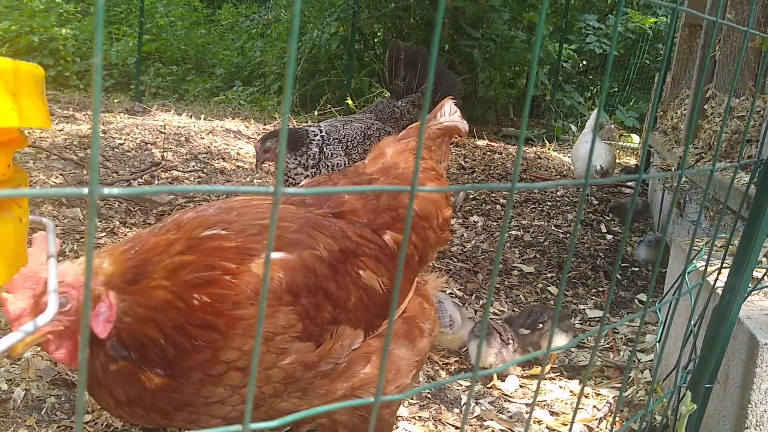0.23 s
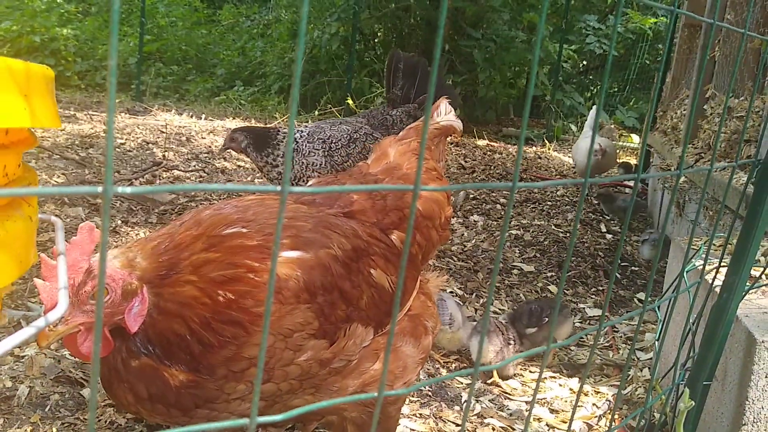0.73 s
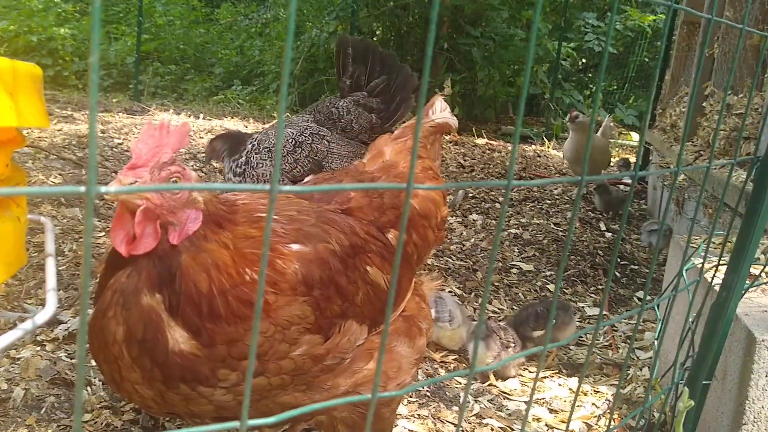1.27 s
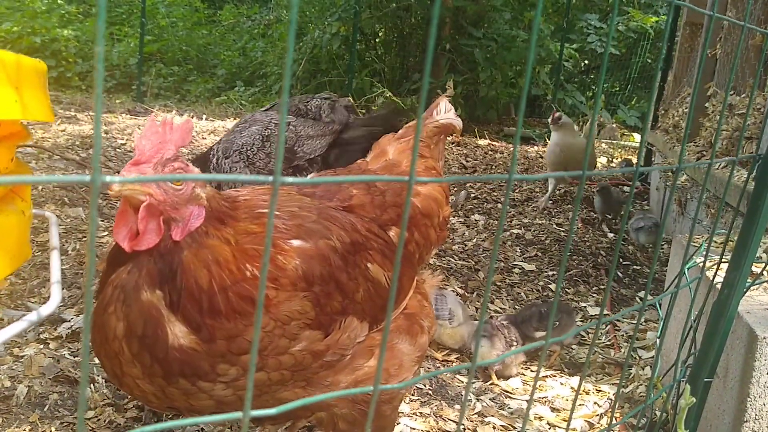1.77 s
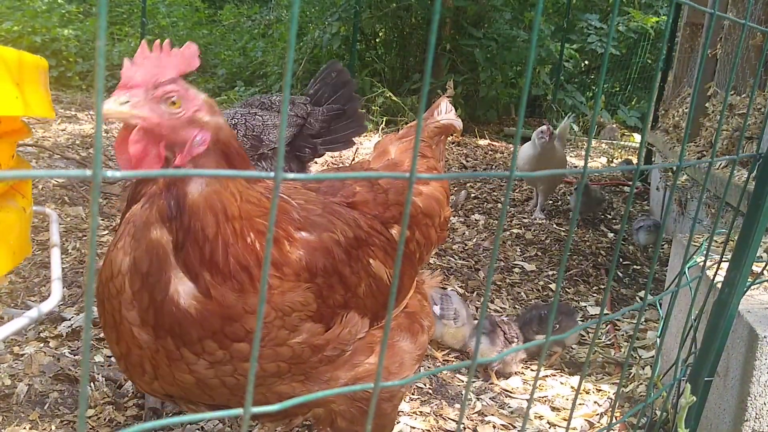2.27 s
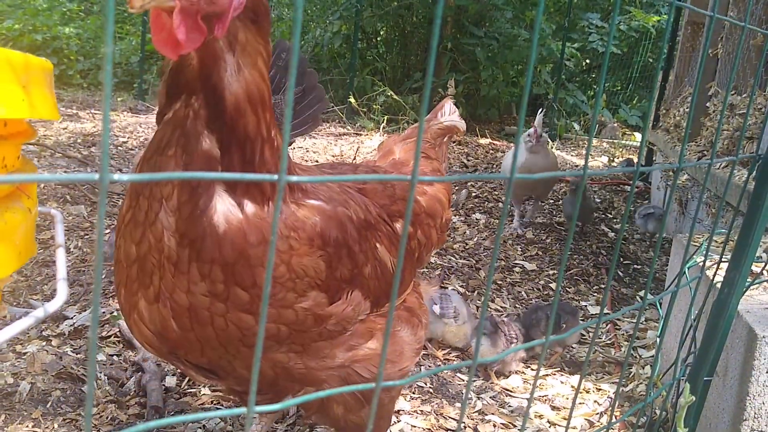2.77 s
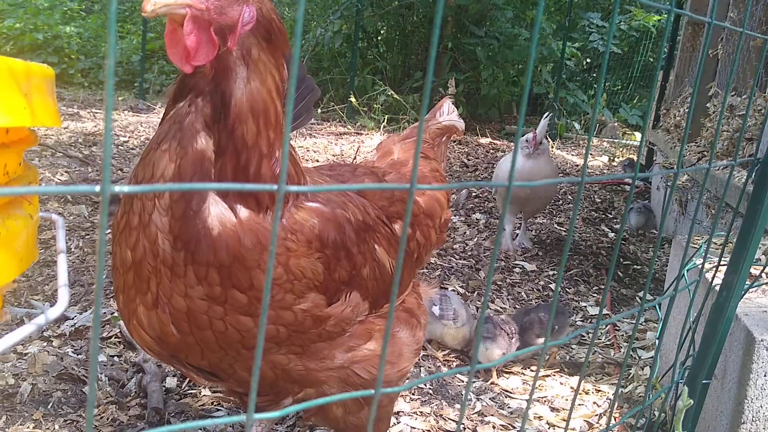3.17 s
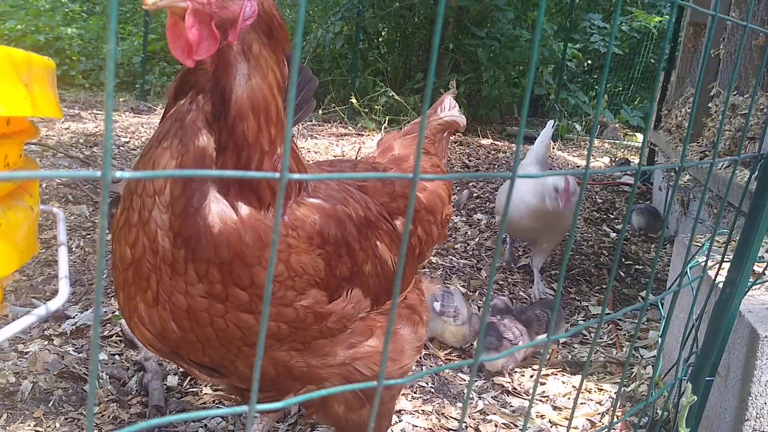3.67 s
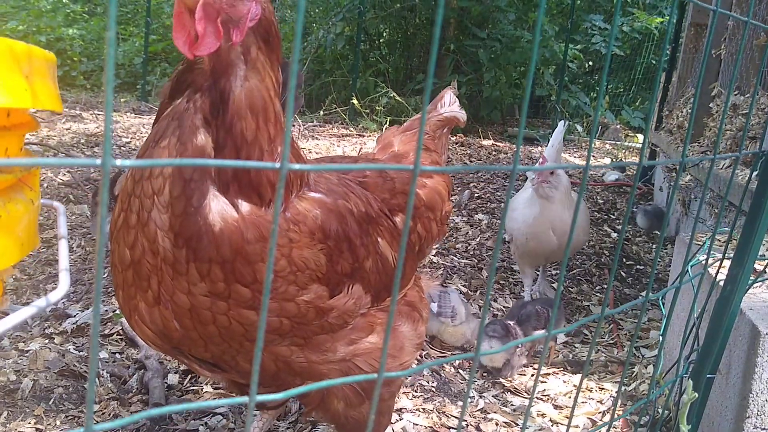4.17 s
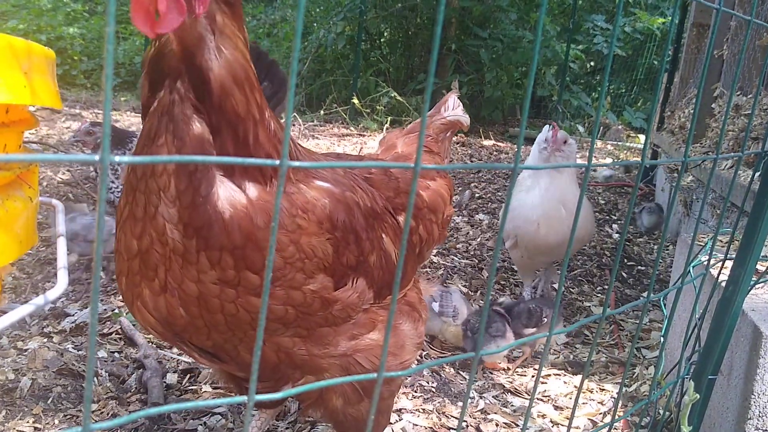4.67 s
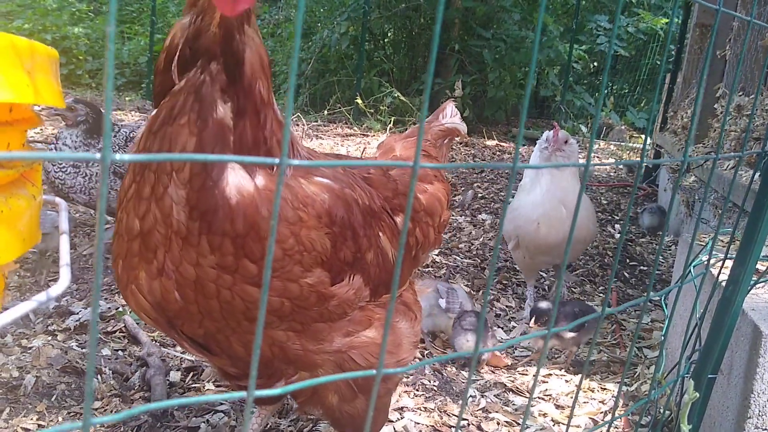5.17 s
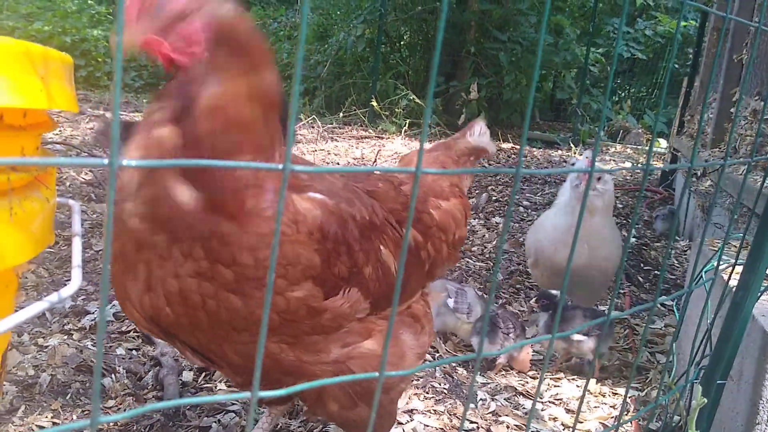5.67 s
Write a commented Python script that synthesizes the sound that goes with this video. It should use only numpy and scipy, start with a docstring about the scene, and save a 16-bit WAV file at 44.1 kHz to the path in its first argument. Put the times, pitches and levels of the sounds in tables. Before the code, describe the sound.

A nearby hen opens with a held, quavering wail. Short clucks and thin chick peeps follow, then a rising moan and a squeak lead into a second, longer wail. Several hens moan softly over one another, and one gives a brief dry rattle near the end. Behind them in the outdoor run, faint cicadas swell over a low rumble and a few distant bird notes.

```python
"""Hens and chicks in a backyard

Hens wail, moan, squeak and cluck, their voices shaped by throat resonances; one ends with a dry rattle.
Chicks peep around them in short gliding whistles, and far-off birds hold faint notes. Cicadas swell
in the trees, a hissing chorus and one clicking buzz, over a low rumble and the hush of the garden."""
import sys
import numpy as np
from scipy import signal
from scipy.fft import rfft, irfft
from scipy.io import wavfile

SR = 44100
rng = np.random.default_rng(int(sys.argv[2]) if len(sys.argv) > 2 else 0)


def file_out(sig):
    """Save sig as 16-bit WAV at sys.argv[1]."""
    # one column per channel
    cols = np.atleast_2d(sig).T
    # limit, then scale
    lim = np.clip(cols, -1, 1)
    pcm = np.round(lim * 32767).astype(np.int16)
    wavfile.write(sys.argv[1], SR, pcm)


N = 260631
TIME = np.arange(N) / SR


def gain_of(db):
    """Decibels to a factor."""
    return 10 ** (np.asarray(db) / 20)


def unit_rms(x):
    """Scales to an rms of one."""
    return x / np.sqrt(np.mean(x ** 2) + 1e-20)


def db_at(spectrum, hz):
    """Reads a spectrum on a log-frequency axis."""
    points_hz, db = np.transpose(spectrum)
    return np.interp(np.log(hz + 1), np.log(points_hz + 1), db)


def follow(rows, t):
    """Reads every column of a curve at the times t."""
    times, *columns = np.transpose(rows)
    return [np.interp(t, times, column) for column in columns]


def add(mix, start_s, sound):
    """Mixes a sound in at start_s."""
    part = mix[max(round(start_s * SR), 0):][:len(sound)]
    part += sound[:len(part)]


def noise(colour):
    """Noise of unit rms with the given spectrum."""
    hz = np.fft.rfftfreq(N, 1 / SR)
    return unit_rms(irfft(rfft(rng.standard_normal(N)) * gain_of(db_at(colour, hz)), N))


def waver(rate_hz, octaves, size=N):
    """Random wobble of about unit rms, in a band around a rate."""
    hz = np.fft.rfftfreq(N, 1 / SR)
    band = np.exp(-(np.log2((hz + 0.00093) / rate_hz) / octaves) ** 2 / 2)
    return unit_rms(irfft(rfft(rng.standard_normal(N)) * band, N))[:size]


def bump(t, length):
    """A smooth rise and fall, centred on zero."""
    return np.cos(np.pi * np.clip(t / length, -.5, .5)) ** 2


def yard(x, wet_db, t60_s):
    """Adds sparse, fading scatter from fence, wall and trees."""
    t = np.arange(SR // 2) / SR
    taps = rng.standard_normal(len(t)) * (rng.random(len(t)) < 2000 / SR)
    taps *= (t > .005) * gain_of(-60 * t / t60_s)
    return x + gain_of(wet_db) * signal.fftconvolve(x, taps / np.linalg.norm(taps))[:N]


# Air rushing through the open beak: freq_hz, level_db
BEAK_AIR = [(100, -17), (400, -7.5), (900, 8), (1300, -5), (1550, -17.5), (1850, 5.5), (2500, -22),
            (3000, -26.5), (3600, -1.5), (4200, -9), (7200, -8), (8200, -23)]
def hen_voice(rows, throat, quaver, quaver_hz, jitter, rasp, upper_db, air_db, doubling=((0, 0),)):
    """Quavering harmonics filtered by the throat, plus pulsing breath; returns start_s and the sound."""
    t = np.arange(rows[0][0], rows[-1][0], 1 / SR)
    size = len(t)
    pitch_hz, level_db, second_db = follow(rows, t)
    hz = pitch_hz * (1 + quaver * waver(quaver_hz, 1.0, size))
    turns = np.cumsum(hz * (1 + jitter * waver(90, 0.4, size))) / SR
    # second_db and upper_db set harmonics 2 and 3 against the first, ahead of the throat
    source_db = [0, second_db] + [upper_db - 6 * np.log2(k / 3) for k in range(3, 9)]
    tone = power = 0
    for k, db in enumerate(source_db, 1):
        tone += gain_of(db + db_at(throat, k * hz)) * np.cos(2 * np.pi * k * turns)
        power += gain_of(db + db_at(throat, k * pitch_hz)) ** 2 / 2
    # uneven beats rasp; alternating strong and weak beats add the octave below
    depth, = follow(doubling, t)
    beats = 1 + rasp * waver(49, 0.66, size)
    beats += depth * (1 + 0.54 * waver(25, 0.78, size)) * np.cos(np.pi * turns)
    air = gain_of(air_db) * noise(BEAK_AIR)[:size] * (1 + 0.32 * np.cos(2 * np.pi * turns))
    fades = signal.windows.tukey(size, 0.0019 * SR / size)
    return t[0], gain_of(level_db) * (tone / np.sqrt(power) * beats + air) * fades


# Upward catches in a wail: centre_s, length_s, rise_hz
CATCHES = [(0.083, .06, 52), (0.324, .04, 25.5), (0.383, .035, 44), (2.961, .05, 75.5), (3.038, .04, 46),
           (3.129, 0.088, 73), (3.279, 0.068, 90), (3.36, 0.0333, 85), (3.465, 0.063, 35.5),
           (3.53, 0.032, 37.5), (3.627, .04, 19.7)]
def wail_contour(start_s, hold_s, release_s, start_db, full_db, second_db, sag):
    """Rows for hen_voice: a note that swells and lifts with effort, thins as it catches, then drops."""
    t = np.arange(0, hold_s + release_s, .001)
    effort_db = full_db + (start_db - full_db) * np.clip(1 - t / hold_s, 0, 1) ** 1.3
    held_hz = 644.1 + 3 * (effort_db + 40)
    lift_hz = sum(rise * bump(start_s + t - centre, length) for centre, length, rise in CATCHES)
    after_s = np.maximum(t - hold_s, 0)
    dropped = 1 - np.exp(-(after_s / 0.015) ** 2)
    dying = (after_s / release_s) ** 4
    pitch_hz = (held_hz + lift_hz) * (1 - .21 * dropped) * (1 - sag * dying)
    level_db = effort_db - 0.0167 * lift_hz - 4 * dropped - 22.5 * dying
    return np.transpose([start_s + t, pitch_hz, level_db, second_db + 0.5 * (level_db - full_db)])


# Hoarse spells in a wail: centre_s, length_s, depth_ratio
HOARSE_SPELLS = [(.01, 0.046, 0.2), (0.352, .05, 0.25), (3.021, 0.073, 0.56), (3.503, 0.038, 0.62),
                 (3.8, .12, 0.22)]
def hoarse(start_s, sound, rate_hz):
    """A second, slower vibration in the throat beats against the voice for moments at a time."""
    t = start_s + np.arange(len(sound)) / SR
    depth = sum(peak * bump(t - centre, length) for centre, length, peak in HOARSE_SPELLS)
    turns = np.cumsum(rate_hz * (1 + 0.11 * waver(30, 1.0, len(t)))) / SR
    return start_s, sound * (1 + depth * np.cos(2 * np.pi * turns))


# The throat of a wailing hen: freq_hz, gain_db
WAIL_THROAT = [(200, -14), (600, 0.5), (1290, 3.5), (1350, -7), (1420, -22), (1550, -1), (1900, -33),
               (2600, -30), (3600, -14.5), (5000, -39.5), (8000, -47.5)]
# Wails: start_s, hold_s, release_s, start_db, full_db, second_harmonic_db, final_sag_ratio
WAILS = [(0, 0.462, 0.054, -41.5, -39.5, 1.5, 0.42), (2.958, 0.8993, 0.1, -51.5, -39, 5, 0.06)]
def wails():
    """Two loud held cries; each catch pushes the second harmonic off the throat's resonance."""
    out = np.zeros(N)
    for row in WAILS:
        call = hen_voice(wail_contour(*row), WAIL_THROAT, quaver=0.019, quaver_hz=34.5, jitter=0.008,
                         rasp=0.064, upper_db=-8, air_db=-22, doubling=[(0, 0.0078)])
        add(out, *hoarse(*call, rate_hz=105))
    return out


# The swell of the chorus: time_s, level_db
CHORUS_SWELL = [(0.0, -66), (0.35, -65.5), (0.48, -68), (0.76, -72), (2.17, -67.5), (3.14, -60.5),
                (3.74, -57), (4.21, -59.5), (4.62, -57.5), (4.77, -60.5), (5.1, -61.5), (5.91, -60)]
# Its bright hiss: freq_hz, level_db
CHORUS_COLOUR = [(2500, -28), (3500, -14.5), (4200, -7.5), (4700, -1), (5500, -5.5), (6300, -1), (7200, 1),
                 (7650, 0), (7950, -19), (8400, -23.5)]
def cicada_chorus(trim_db=1):
    """Many far cicadas blur into a fluttering hiss."""
    level_db, = follow(CHORUS_SWELL, TIME)
    flutter_db = 0.74 * waver(12, 0.87)
    return gain_of(level_db + trim_db + flutter_db) * noise(CHORUS_COLOUR)


# The nearest cicada's buzz: time_s, level_db
BUZZ_SWELL = [(0, -79), (1.6, -76), (2.3, -69), (3.1, -59), (3.7, -59), (4.7, -60.5), (5.2, -65.5),
              (5.91, -63)]
# Its sharpest whine, a single harmonic: time_s, level_db
WHINE_SWELL = [(0, -83), (1.85, -75), (2.25, -63), (2.75, -62.5), (3.12, -54), (3.45, -62.5), (3.95, -58),
               (4.72, -61), (4.92, -72), (5.91, -69)]
# Multiples of the click rate that its body favours: harmonic_number, gain_db
CICADA_BODY = [(25, -6.5), (26, -10), (27, -9), (28, -7.5), (30, -11.5), (31, -17), (33, -12.5), (34, -3),
               (38, -14.5), (40, -24)]
def near_cicada(click_hz=203.6, quicken_hz_per_s=.76, whine_harmonic=36):
    """High harmonics of a slowly quickening click rate; leaves make each fade and drift by itself."""
    buzz_db, = follow(BUZZ_SWELL, TIME)
    whine_db, = follow(WHINE_SWELL, TIME)
    turns = np.cumsum(click_hz + quicken_hz_per_s * TIME) / SR

    def harmonic(k, fade_db):
        fading = gain_of(fade_db * waver(1.8, 1.1))
        return fading * np.cos(2 * np.pi * (k * turns + rng.random()) + 0.31 * waver(4.5, 0.52))

    buzz = sum(gain_of(db) * harmonic(k, fade_db=3) for k, db in CICADA_BODY)
    whine = harmonic(whine_harmonic, fade_db=1.8)
    return gain_of(buzz_db) * unit_rms(buzz) + gain_of(whine_db) * unit_rms(whine)


# The background bed: time_s, rumble_db, hush_db
GARDEN_LEVELS = [(0, -60, -68), (.4, -59.5, -74), (.6, -66.5, -76), (1.3, -67, -75.5), (2.2, -69, -74.5),
                 (2.6, -63, -70), (3.7, -59.5, -69.5), (4.8, -61.5, -72.5), (5.5, -60, -73.5),
                 (5.91, -67.5, -71.5)]
# The deep rumble: freq_hz, level_db
RUMBLE_COLOUR = [(18, -62), (35, -24), (50, -2.5), (62, 1.5), (78, -2), (92, -7), (122, -4.5), (160, -16),
                 (250, -22.5), (400, -46.5), (1000, -68)]
# The soft hush: freq_hz, level_db
HUSH_COLOUR = [(20, -28), (60, -0.5), (200, 5), (400, 0), (800, -0.5), (1500, -1.5), (2600, -4),
               (4000, -11), (8000, -16)]
def garden(hum_hz=78.4):
    """A distant low rumble with a wavering hum in it, and a soft broadband hush."""
    rumble_db, hush_db = follow(GARDEN_LEVELS, TIME)
    hum = np.sin(2 * np.pi * np.cumsum(hum_hz + 2.5 * waver(3.94, 0.99)) / SR)
    rumble = unit_rms(noise(RUMBLE_COLOUR) + gain_of(0.5) * hum)
    return gain_of(rumble_db) * rumble + gain_of(hush_db) * noise(HUSH_COLOUR)


def whistles(rows, glide, tremble, overtone_db):
    """Nearly pure bird notes; glide gives the pitch as u runs from 0 to 1 along each note."""
    out, wobble = np.zeros(N), waver(130, 1.0)
    for start_s, length_s, level_db, *shape in rows:
        u = np.arange(0, 1, 1 / (length_s * SR))
        unsteady = np.roll(wobble, -round(start_s * SR))[:len(u)]
        phase = 2 * np.pi * np.cumsum(glide(u, *shape) * (1 + tremble * unsteady)) / SR
        swell = np.sqrt(2) * np.sin(np.pi * u) ** 0.28 * (1 + 0.2 * unsteady)
        tone = np.sin(phase) + gain_of(overtone_db) * np.sin(2 * phase)
        add(out, start_s, gain_of(level_db) * swell * tone)
    return out


# Peeps that sweep up: start_s, length_s, level_db, start_hz
RISING_PEEPS = [(.449, 0.039, -60.5, 2200), (1.774, 0.028, -65, 2660), (1.92, .057, -65.5, 2250),
                (2.941, .028, -57.5, 2420), (3.668, 0.03, -60, 1998), (5.869, 0.031, -60.5, 2630)]
# Peeps that settle, then flick up: start_s, length_s, level_db, held_hz, start_above_ratio, rise_ratio
SCOOPED_PEEPS = [(.647, 0.054, -61, 2734, -0.0065, 0.77), (.9, 0.047, -61.5, 3080, 0.21, 0.37),
                 (1.65, 0.074, -67.5, 3140, 0.1, 0.4), (1.662, 0.049, -65, 2740, 0.058, 0.4),
                 (2.551, 0.053, -60, 3050, 0.06, 0.5), (2.745, .046, -62.5, 3540, -0.015, 0.13),
                 (3.627, .045, -60.5, 3180, 0.07, 0.1), (3.893, 0.055, -54, 2260, 0.16, 0.51),
                 (4.06, 0.046, -68.5, 3190, 0.047, .24), (4.22, .045, -68, 3920, .05, .1),
                 (4.44, .033, -65, 3930, .12, .02)]
# Peeps that sweep down: start_s, length_s, level_db, start_hz
FALLING_PEEPS = [(1.04, 0.061, -72.5, 3820), (1.17, .05, -74.5, 4260), (1.339, 0.02, -70, 4230),
                 (1.888, .037, -69.5, 4250), (2.085, 0.031, -71, 4170), (2.867, 0.033, -62.5, 4090),
                 (3.059, 0.038, -67.5, 4000), (3.521, .022, -66, 4380), (4.18, 0.025, -61, 4200),
                 (4.649, 0.037, -61.5, 3990), (4.768, 0.025, -64.5, 4200), (5.086, 0.046, -66.5, 3650)]
# Peeps that leap to a top note and slide off: start_s, length_s, level_db, top_hz, top_position_ratio
ARCHED_PEEPS = [(3.546, 0.054, -51, 3490, 0.35), (3.975, .055, -53, 3635, 0.24),
                (4.88, .052, -64, 3560, 0.2), (5.45, .028, -71, 2920, .3), (5.758, 0.039, -62.5, 3100, .25)]
def chicks():
    """Chicks whistle four shapes of peep; the falling ones are thinner and farther off."""
    rising = lambda u, hz: hz * (1 + .52 * u ** 1.2)
    scooped = lambda u, hz, above, rise: hz * (1 + above * (1 - u) ** 3 + rise * u ** 5.4)
    falling = lambda u, hz: hz * (1 - .24 * u ** 1.6)
    arched = lambda u, hz, top: hz * (1 - .19 * (u - top) ** 2 / ((u - top) ** 2 + 0.42 ** 2))
    kinds = [(RISING_PEEPS, rising), (SCOOPED_PEEPS, scooped), (ARCHED_PEEPS, arched)]
    near = sum(whistles(rows, glide, tremble=0.0033, overtone_db=-15) for rows, glide in kinds)
    far = whistles(FALLING_PEEPS, falling, tremble=0.0078, overtone_db=-21)
    return yard(near, wet_db=-17, t60_s=0.32) + yard(far, wet_db=-7.5, t60_s=0.092)


# Short clucks: start_s, length_s, level_db, pitch_hz, throat_hz
CLUCKS = [(.652, 0.026, -61.5, 353, 690), (.703, 0.02, -51.5, 546, 840), (1.328, .031, -65.5, 364, 840),
          (1.382, .016, -52.5, 510, 760), (1.659, .045, -51, 356.7, 740), (2.128, 0.016, -58, 253, 476),
          (2.141, 0.031, -51.5, 386.6, 910), (2.282, 0.016, -58, 240, 460), (2.292, 0.034, -52.5, 391, 710),
          (2.342, .015, -49.5, 505, 846), (3.96, 0.028, -62.5, 268, 414)]
def clucks(firm_db=-51.5):
    """Bursts of pulses and puffs through one throat resonance, cut steeply below it."""
    out = np.zeros(N)
    throat = lambda ratio: 1 / (1 + 1.25j * (ratio - 1 / ratio)) ** 2 / (1 + (0.58 / ratio) ** 6)
    for start_s, length_s, level_db, pitch_hz, throat_hz in CLUCKS:
        u = np.arange(0, 1, 1 / (length_s * SR))
        # a firm cluck is clear and falls slightly; softer ones are hoarser and rise
        softer_db = firm_db - level_db
        glide = -0.021 + 0.2 * softer_db
        rough = np.clip(0.24 + 0.15 * softer_db, 0, 1)
        turns = np.cumsum(pitch_hz * (1 + glide * (u - .5))) / SR
        tone = sum(throat(k * pitch_hz / throat_hz) / k ** 1.44 * np.exp(2j * np.pi * k * turns)
                   for k in range(1, 9)).real
        breath = irfft(rfft(rng.standard_normal(SR)) * throat((np.arange(SR // 2 + 1) + 1) / throat_hz))
        puffs = breath[:len(u)] * (1 + 1.2 * np.cos(2 * np.pi * turns))
        sound = unit_rms((1 - rough) * unit_rms(tone) + rough * unit_rms(puffs))
        add(out, start_s, gain_of(level_db) * sound * np.sin(np.pi * u ** 0.73))
    return out


# Thin calls of far-off birds: start_s, length_s, level_db, start_hz, end_hz
FAR_CALLS = [(1.39, .4, -82, 3360, 3270), (1.4, .22, -83, 2990, 2830), (2.14, .12, -78, 3520, 3420),
             (4.47, .22, -79, 2310, 2260), (5.02, .07, -79, 2450, 2390), (5.09, .09, -79, 2130, 2090)]
def far_birds():
    """Faint held notes that sink a little, blurred by the trees."""
    straight = lambda u, start_hz, end_hz: start_hz + (end_hz - start_hz) * u
    return yard(whistles(FAR_CALLS, straight, tremble=.025, overtone_db=-30), wet_db=-6, t60_s=.4)


# The throat in moans and squeaks: freq_hz, gain_db
MOAN_THROAT = [(200, 2.5), (750, 14), (1100, 0), (1400, -7.5), (1900, -14.5), (2600, -43), (4000, -30),
               (8000, -40)]
# Four moan contours: time_s, pitch_hz, level_db, second_harmonic_db
CLIMBING_MOAN = [(2.32, 405, -63.5, 3), (2.38, 421, -57.5, 8), (2.46, 453, -56, 9), (2.56, 464, -54.5, 10),
                 (2.7, 506, -60.5, -0.5), (2.76, 555, -56.5, 13), (2.85, 571, -55, 22.5),
                 (2.87, 650, -58, 6)]
LOW_MOAN = [(4.07, 275, -84, -15), (4.115, 252, -58.5, -17), (4.16, 245, -61, -10),
            (4.25, 241, -59.5, -13.5), (4.29, 236, -78, -11)]
HIGH_MOAN = [(4.155, 670, -64, -12), (4.195, 600, -57.5, 8), (4.25, 622, -59.5, -12), (4.305, 614, -54, 5),
             (4.33, 635, -59, 1), (4.345, 840, -71, 13), (4.385, 880, -62.5, 18), (4.405, 760, -62, 10)]
PURRING_MOAN = [(4.35, 322, -71.5, -7), (4.405, 328, -55.5, 4), (4.418, 336, -49.5, 2),
                (4.452, 329, -51.5, 3.5), (4.485, 360, -49.5, 1), (4.505, 325.5, -52, 3.5),
                (4.53, 368, -50, 2), (4.605, 353, -52, 4.5), (4.648, 451, -54, -3), (4.666, 470, -77.5, -4)]
def moans():
    """Soft voiced calls from several hens: one climbs through a growl, then three overlap."""
    out = np.zeros(N)
    growl = [(2.43, 0.05), (2.47, 0.33), (2.55, 0.52), (2.58, 0.07)]  # time_s, depth_ratio
    add(out, *hen_voice(CLIMBING_MOAN, MOAN_THROAT, quaver=0.022, quaver_hz=31.1, jitter=0.0061,
                        rasp=0.16, upper_db=2.5, air_db=-22.5, doubling=growl))
    add(out, *hen_voice(LOW_MOAN, MOAN_THROAT, quaver=0.0058, quaver_hz=25, jitter=0.0091,
                        rasp=.04, upper_db=-11, air_db=-18))
    add(out, *hen_voice(HIGH_MOAN, MOAN_THROAT, quaver=0.0067, quaver_hz=25, jitter=0.012,
                        rasp=0.031, upper_db=-1, air_db=-31))
    last = hen_voice(PURRING_MOAN, MOAN_THROAT, quaver=0.031, quaver_hz=42, jitter=0.006,
                     rasp=0.093, upper_db=1.5, air_db=-21)
    add(out, *purring(*last, rate_hz=58, depth=0.34))
    return out


# Two squeak contours: time_s, pitch_hz, level_db, second_harmonic_db
LONG_SQUEAK = [(2.861, 810, -59, -23), (2.872, 842, -47, -26.5), (2.9, 815, -44, -31),
               (2.925, 808, -48.5, -21), (2.945, 860, -42.5, -13), (2.958, 810, -47, -22),
               (2.967, 720, -58, -15)]
SHORT_SQUEAK = [(3.251, 900, -60, -23), (3.26, 905, -40, -20), (3.269, 871, -41.5, -7),
                (3.282, 730, -53.5, -17)]
def squeaks():
    """A hen's voice breaks upward into a nearly pure tone."""
    out = np.zeros(N)
    add(out, *hen_voice(LONG_SQUEAK, MOAN_THROAT, quaver=0.026, quaver_hz=40, jitter=0.0082,
                        rasp=0.019, upper_db=-29, air_db=-26))
    add(out, *hen_voice(SHORT_SQUEAK, MOAN_THROAT, quaver=0.0089, quaver_hz=40, jitter=.008,
                        rasp=.03, upper_db=-29, air_db=-26))
    return out


def purring(start_s, sound, rate_hz, depth):
    """A moan throbs as the voice beats at a slightly uneven rate."""
    turns = np.cumsum(rate_hz * (1 + .15 * waver(20, 0.94, len(sound)))) / SR
    return start_s, sound * (1 + depth * np.cos(2 * np.pi * turns))


# The force behind the rattle: time_s, level_db
RATTLE_FORCE = [(5.483, -55.5), (5.5, -50.5), (5.562, -47.5), (5.583, -56.5)]
def rattle(start_s=5.4825, rate_hz=61, pulses=7, lead_s=.01):
    """A creak so slow that each puff is heard alone, sinking and dulling as the hen's throat closes."""
    out, t, hz = np.zeros(N), np.arange(2048) / SR, np.fft.rfftfreq(2048, 1 / SR) + 1
    resonance = lambda centre, width: 1 / (1 + 1j * (hz ** 2 - centre ** 2) / (hz * width))
    opened, shut = (2220, -10, -4), (980, 1, -35)  # throat_hz, low_db, edge_db
    for k, (throat_hz, low_db, edge_db) in enumerate(np.linspace(opened, shut, pulses)):
        pulse_s = start_s + k / rate_hz
        level_db, = follow(RATTLE_FORCE, pulse_s)
        puff = rng.standard_normal(len(t)) * np.exp(-((t - lead_s) / 0.0044) ** 2)
        throat = resonance(throat_hz, 1970) ** 3 + gain_of(low_db) * resonance(935, 280) ** 2
        throat += gain_of(edge_db) * resonance(3270, 900) ** 2
        pulse = irfft(rfft(puff) * throat / (1 + (720 / hz) ** 8))  # a small throat radiates little bass
        pulse /= np.sqrt(np.sum(pulse ** 2) / (0.0097 * SR))
        add(out, pulse_s - lead_s, gain_of(level_db) * pulse)
    return out


def scene():
    """The flock close by; birds, insects and garden behind, in mono."""
    hens = yard(wails() + squeaks() + moans() + clucks() + rattle(), wet_db=-18, t60_s=.11)
    return (hens + chicks() + far_birds() + cicada_chorus() + near_cicada() + garden())[None]


def record(dry):
    """A steep low-pass takes off the top of the treble."""
    lowpass = signal.firwin(401, cutoff=8350, window=("kaiser", 8), fs=SR)
    return signal.oaconvolve(dry, lowpass[None], "same")


dry = scene()
out = record(dry)
file_out(out)
```